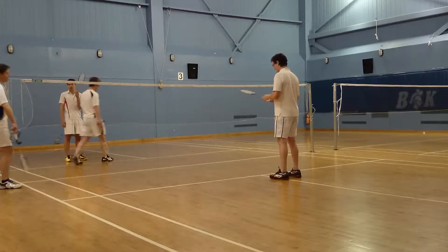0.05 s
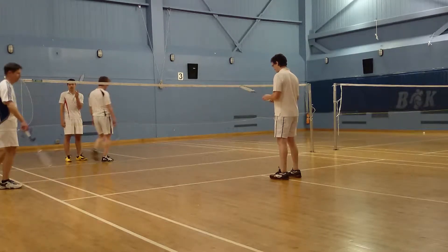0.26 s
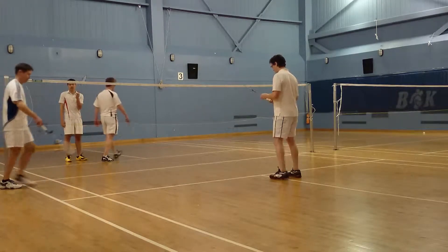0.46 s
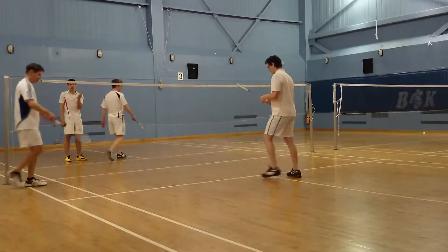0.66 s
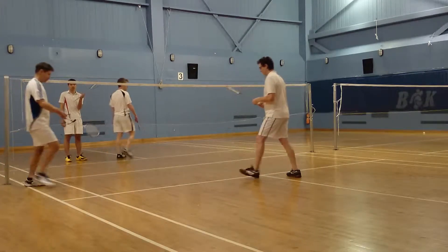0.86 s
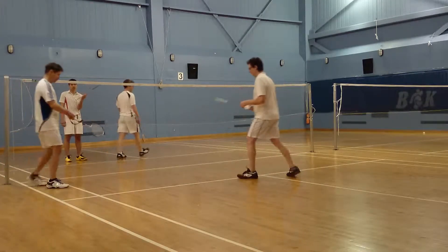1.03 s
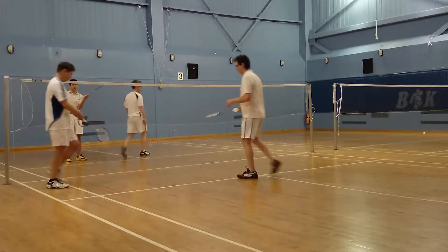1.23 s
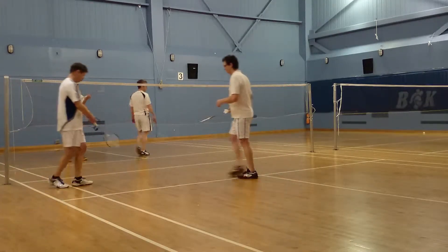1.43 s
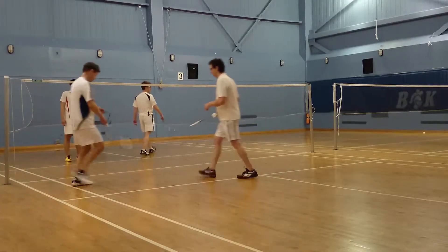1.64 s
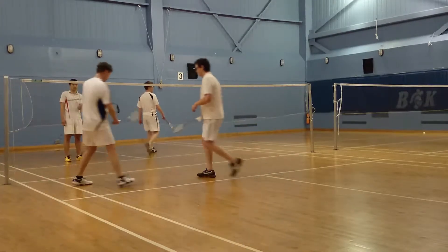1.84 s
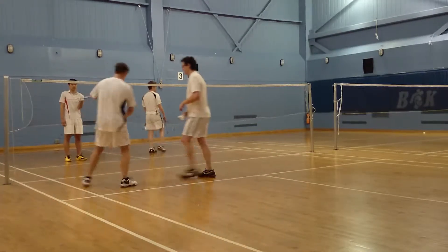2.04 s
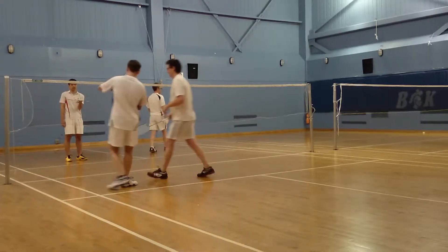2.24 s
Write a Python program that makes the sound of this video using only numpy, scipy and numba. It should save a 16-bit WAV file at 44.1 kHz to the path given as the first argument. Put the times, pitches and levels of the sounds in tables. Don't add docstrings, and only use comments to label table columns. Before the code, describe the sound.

Rubber shoe soles squeak in three short chirps on a wooden court in an echoing hall

```python
import sys
import numpy as np
from scipy import signal
from scipy.fft import rfft, irfft
from scipy.io import wavfile
from scipy.ndimage import uniform_filter1d
from numba import njit

SR = 44100
rng = np.random.default_rng(int(sys.argv[2]) if len(sys.argv) > 2 else 0)


def master(y):
    cut = np.clip(np.atleast_2d(y).T, -1, 1)
    pcm = np.round(cut * 32767)
    wavfile.write(sys.argv[1], SR, pcm.astype(np.int16))


def volts_from_decibels(level):
    exponent = np.asarray(level, float) / 20
    return 10 ** exponent


N = 101077


def shape(points, hz):
    p = np.array(points, float)
    return np.interp(np.log(np.maximum(hz, 1)), np.log(p[:, 0]), p[:, 1])


def walk(rate, size):
    hold = max(int(SR / rate), 1)
    stairs = np.repeat(rng.standard_normal(size // hold + 1), hold)
    return 1.3 * uniform_filter1d(uniform_filter1d(stairs, hold), hold)[:size]


def band(x, hz, width):
    return signal.lfilter(*signal.iirpeak(hz, hz / width, SR), x)


def half_octave(hz, f):
    return np.clip(1 - 2 * abs(np.log2(np.maximum(f, 1) / hz)), 0, 1)


def add(out, s, x):
    i = int(s * SR)
    out[i:i + len(x)] += x[:len(out) - i]


@njit
def follower(x, up, down):
    e, y = 0., np.empty(len(x))
    for i in range(len(x)):
        e += (x[i] - e) * (up if x[i] > e else down)
        y[i] = e
    return y


def duct_drone():
    # t/s, level/dB
    swell = [(0.0, -50.5), (0.11, -29), (0.2, -44.5), (0.33, -33), (0.4, -64.5), (0.45, -36), (0.68, -42),
             (0.72, -47), (0.78, -33), (0.81, -46), (0.93, -36), (0.99, -44), (1.17, -51.5), (1.21, -40),
             (1.46, -43.5), (1.48, -47.5), (2.24, -53), (2.29, -35.5)]
    s, db = np.transpose(swell)
    drone_hz = 57 * (1 + .05 * walk(9, size=N))
    drone = np.sin(2 * np.pi * np.cumsum(drone_hz) / SR)
    return np.sqrt(2) * drone * volts_from_decibels(np.interp(np.arange(N) / SR, s, db))


def ventilation():
    # f/Hz, level/dB per Hz
    air_spectrum = [(15, -38), (25, -7), (65, -4), (87, -10), (225, -20), (372, -40.5), (425, -32),
                    (5840, -62.5), (14000, -67)]
    air_db, flicker_db, side_hz, right_db = -42.5, 2.2, 600, 6
    f = np.fft.rfftfreq(N, 1 / SR)
    noise = rfft(rng.standard_normal((2, N))) * volts_from_decibels(shape(air_spectrum, f)) * (f > 12)
    air = np.zeros((2, N))
    for hz in 22 * 2 ** np.arange(0, 9.6, .5):
        mid, side = irfft(noise * half_octave(hz, f), N)
        share = min(.2 + hz / side_hz, 1)
        air += volts_from_decibels(flicker_db * walk(8, size=N)) * (mid + share * side * np.array([[1], [-1]]))
    air = air * volts_from_decibels(air_db) / air.std()
    rumble = air + duct_drone()
    low = signal.lfilter(*signal.butter(1, 300, fs=SR), rumble)
    bass_gain = volts_from_decibels(np.array([[-right_db], [right_db]]) / 2)
    return rumble + low * (bass_gain - 1)


def hall(x):
    # f/Hz, t60/s
    decay_t60 = [(200, 0), (1000, 1.8), (2900, 1.24), (4500, 1.1), (6000, 0.5665), (9000, .5),
                 (14000, 0.47)]
    # f/Hz, level/dB
    tail_db = [(200, -28.5), (1000, -33.5), (3000, -33.5), (6000, -34.5), (12000, -37.5)]
    # delay/s, left level/dB, right
    # level/dB
    echoes = [(.0033, -24.5, -3.5), (.008, -8, -11), (.019, -9.5, -10), (.041, -9.5, -11), (.066, -13, -10),
              (.112, -15, -14.5)]
    build_s = .012
    t, f = np.arange(N) / SR, np.fft.rfftfreq(N, 1 / SR)
    noise = rfft(rng.standard_normal((2, N)))
    response = np.zeros((2, N))
    for hz in 125 * 2 ** np.arange(0, 7.1, .5):
        part = irfft(noise * half_octave(hz, f), N)
        response += part * volts_from_decibels(shape(tail_db, hz) - 60 * t / shape(decay_t60, hz))
    response *= 1 - np.exp(-t / build_s)
    response[:, 0] = 1
    for delay, left_db, right_db in echoes:
        response[:, int(delay * SR)] += volts_from_decibels(left_db), volts_from_decibels(right_db)
    return signal.fftconvolve(x[None], response, axes=1)[:, :N]


def scuffs():
    # t/s, length/s, level/dB
    drags = [(.128, .03, -62.5), (.52, .025, -57.5), (.598, .036, -41.5), (1.026, .03, -43.5),
             (1.462, .02, -26), (1.82, .04, -56.5), (2.04, .07, -58.5)]
    grain = volts_from_decibels(1.5 * walk(500, size=N))
    grit = band(rng.standard_normal(N) * grain, 6000, width=9000)
    out = np.zeros(N)
    for s, length, db in drags:
        i, n = int(s * SR), int(length * SR)
        swell = np.sin(np.pi * np.arange(n) / n)
        out[i:i + n] += volts_from_decibels(db) * swell * grit[i:i + n]
    return out


def ring(t, hz, t60):
    return np.sin(2 * np.pi * hz * t) * np.exp(-np.log(1000) * t / t60)


def steps():
    # t/s, tick level/dB, knock level/dB, boom level/dB
    landings = [(.103, -42, -52, -62.5), (.134, -56, -44, -50.5), (.156, -56, -48, -54),
                (.524, -54.5, -51, -57), (.5835, -25, -33.5, -50.5), (.610, -50, -39.5, -43),
                (1.0195, -29, -35.5, -47), (1.051, -37.5, -42, -40), (1.4520, -23, -37.5, -48),
                (2.003, -61, -40.5, -47.5), (2.283, -58, -52.5, -48)]
    tick_s, knock_t60_s, boom_t60_s = .00025, .012, .12
    knock_hz, boom_hz = 950, 180
    out, t = np.zeros(N), np.arange(6000) / SR
    for s, tick_db, knock_db, boom_db in landings:
        chance = rng.standard_normal(len(t))
        click = np.exp(-t / tick_s) * (.5 * chance + (t == 0) * 2)
        tick = np.diff(click, prepend=0) / 2
        knock = ring(t, knock_hz * (1 + .08 * chance[0]), knock_t60_s)
        knock += .5 * ring(t, 1.5 * knock_hz, knock_t60_s)
        boom = ring(t, boom_hz * (1 + .1 * chance[1]), boom_t60_s)
        boom += .6 * ring(t, 1.8 * boom_hz, boom_t60_s)
        add(out, s, volts_from_decibels(tick_db) * tick + volts_from_decibels(knock_db) * knock + volts_from_decibels(boom_db) * boom)
    return out


def squeaks():
    # t/s, length/s, start f/Hz, end f/Hz, level/dB
    first_stop = [(.616, .013, 3300, 3190, -28), (.627, .009, 2900, 2800, -24),
                  (.620, .012, 4340, 4350, -27.5), (.618, .012, 7700, 7400, -57),
                  (.606, .012, 3300, 3200, -43)]
    second_stop = [(1.037, .016, 3380, 3180, -21), (1.038, .012, 3800, 3720, -35),
                   (1.050, .012, 3200, 3100, -35)]
    third_stop = [(1.463, .016, 3060, 2760, -17), (1.463, .014, 4700, 4450, -28),
                  (1.463, .007, 7600, 7400, -34.5), (1.468, .011, 2900, 2830, -15)]
    faint_slips = [(.106, .005, 12000, 9500, -49.5), (.106, .009, 5600, 5100, -63.5),
                   (.394, .007, 4800, 4700, -63), (2.052, .012, 5200, 6400, -60.5),
                   (2.062, .010, 4400, 5200, -73), (2.052, .008, 11400, 12300, -66),
                   (2.092, .010, 5000, 5800, -78), (2.086, .010, 10500, 11500, -57)]
    overtone_db = [-17.5, -22, -6, -11.5]
    wobble, flutter_db, wobble_per_s = .008, 5.5, 400
    longest = 2000
    out = np.zeros(N)
    for ribs, loss_db in zip((first_stop, second_stop, third_stop, faint_slips), overtone_db):
        for s, length, hz0, hz1, db in ribs:
            n = min(int(length * SR), longest)
            u = np.arange(n) / (length * SR)
            pitch_wander = walk(wobble_per_s, size=longest)[:n]
            flutter = walk(wobble_per_s, size=longest)[:n]
            slip_hz = (hz0 + (hz1 - hz0) * u) * (1 + wobble * pitch_wander)
            phase = 2 * np.pi * np.cumsum(slip_hz) / SR
            tone = np.zeros(n)
            for k in range(5):
                if (k + 1) * hz0 < 17000:
                    tone += volts_from_decibels(k * loss_db) * np.sin((k + 1) * phase)
            swell = np.sin(np.pi * u ** .8) ** .7
            add(out, s, volts_from_decibels(db + flutter_db * flutter) * swell * tone)
    return out


def scene():
    feet = squeaks() + steps() + scuffs()
    return hall(feet) + ventilation()


def microphone_ports(x):
    # resonance f/Hz, width/Hz, lift level/dB, treble loss from f/Hz
    port_table = [(7900, 2200, 7, 13000), (5600, 1500, 11, 8500)]
    right_late_s = .00013
    f = np.fft.rfftfreq(N, 1 / SR)
    responses = []
    for hz, width, lift_db, top_hz in port_table:
        detuning = (f / hz - hz / np.maximum(f, 1)) * hz / width
        resonance = 1 + (volts_from_decibels(lift_db) - 1) / (1 + 1j * detuning)
        treble_loss = 1 + 1j * f / top_hz - (f / top_hz) ** 2
        responses.append(resonance / treble_loss)
    responses[1] = responses[1] * np.exp(-2j * np.pi * f * right_late_s)
    return irfft(rfft(x) * np.array(responses), N)


def gain_control(x):
    limit_db, ratio, grab_s, let_go_s = -12, 2.5, .004, 2.5
    loudness = follower(abs(x).max(axis=0), 1 / (grab_s * SR), 1 / (let_go_s * SR))
    return x * np.minimum(volts_from_decibels(limit_db) / (loudness + 1e-9), 1) ** (1 - 1 / ratio)


def roll_off(x):
    return signal.sosfilt(signal.butter(12, 15850, fs=SR, output="sos"), x)


def record(dry):
    mix = gain_control(microphone_ports(dry))
    return roll_off(mix)


dry = scene()
out = record(dry)
master(out)
```